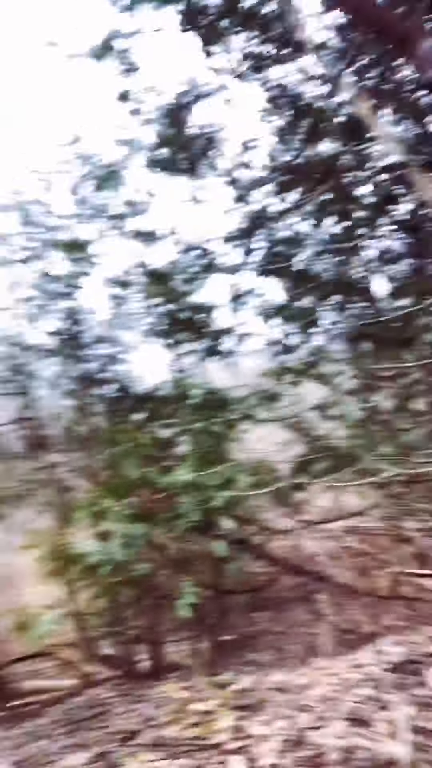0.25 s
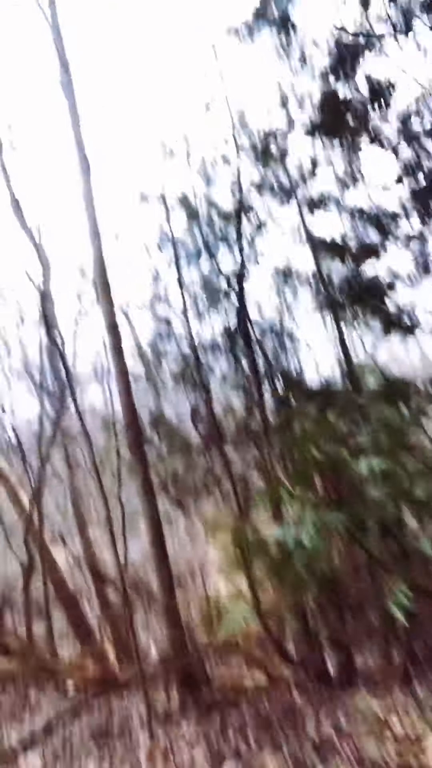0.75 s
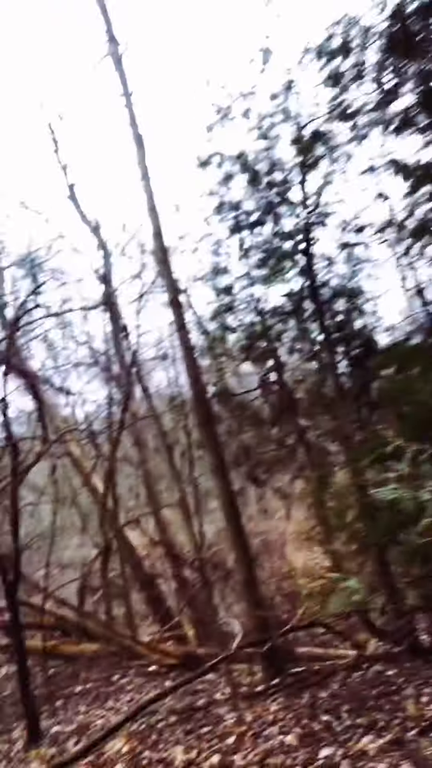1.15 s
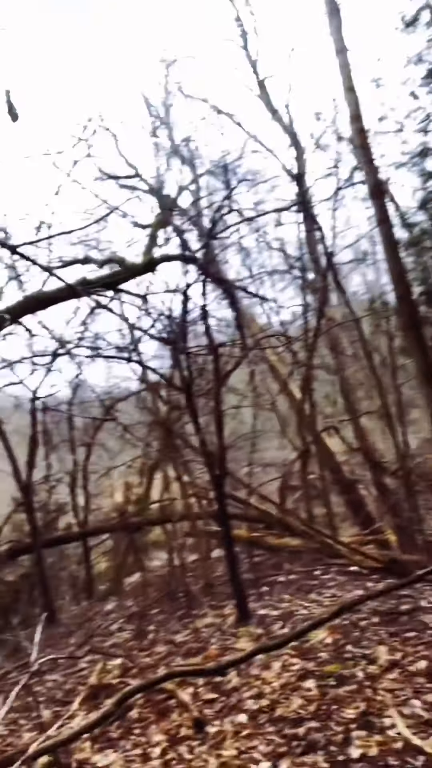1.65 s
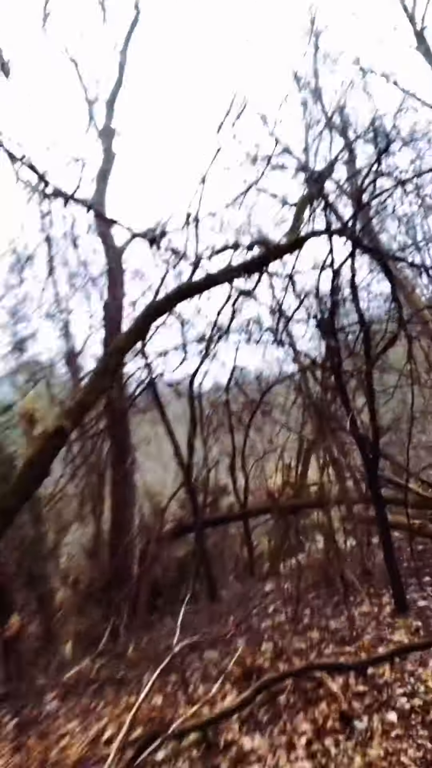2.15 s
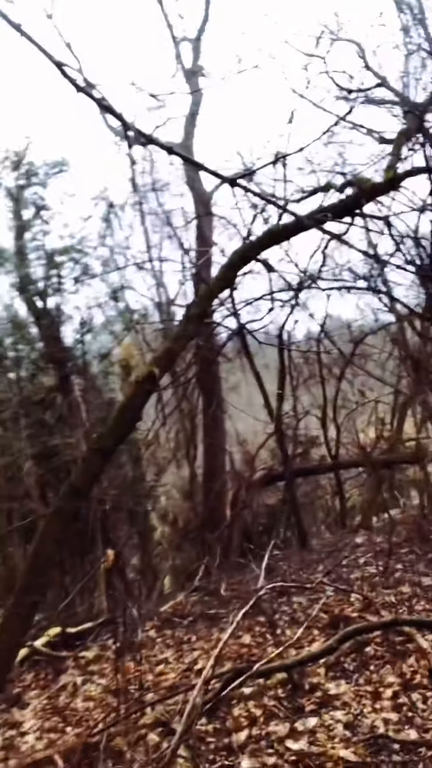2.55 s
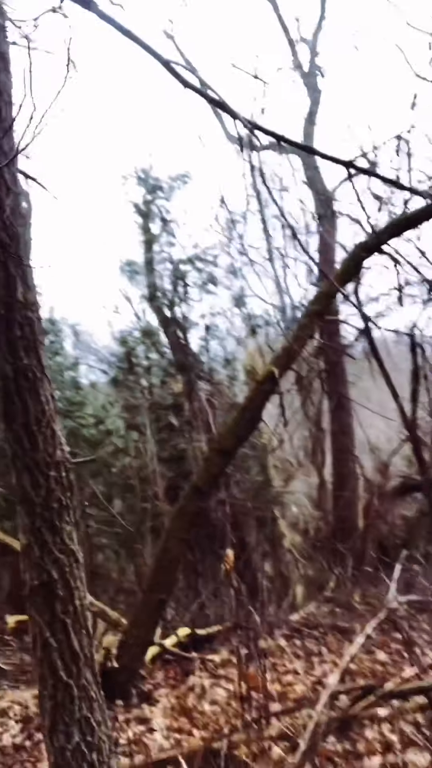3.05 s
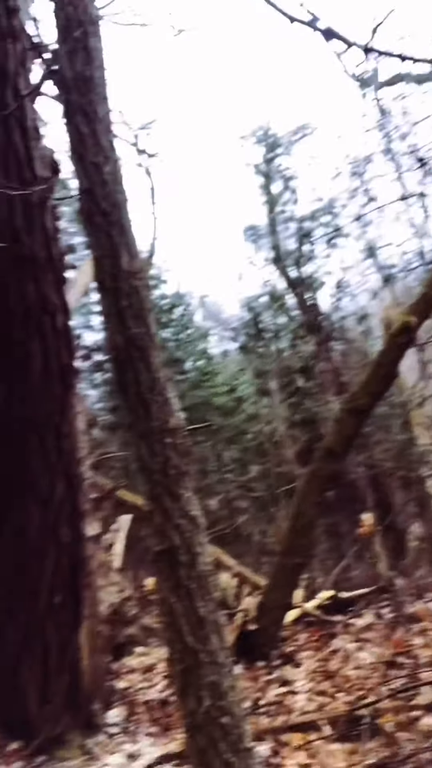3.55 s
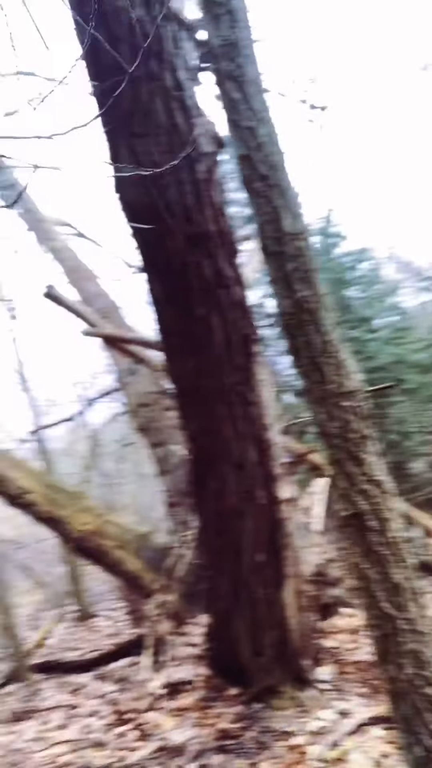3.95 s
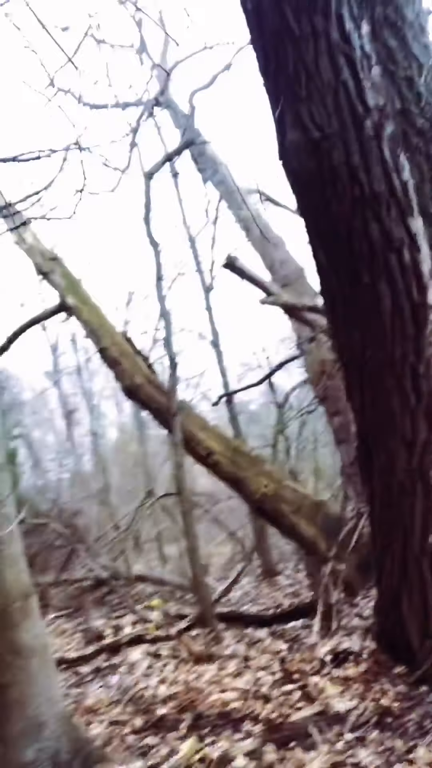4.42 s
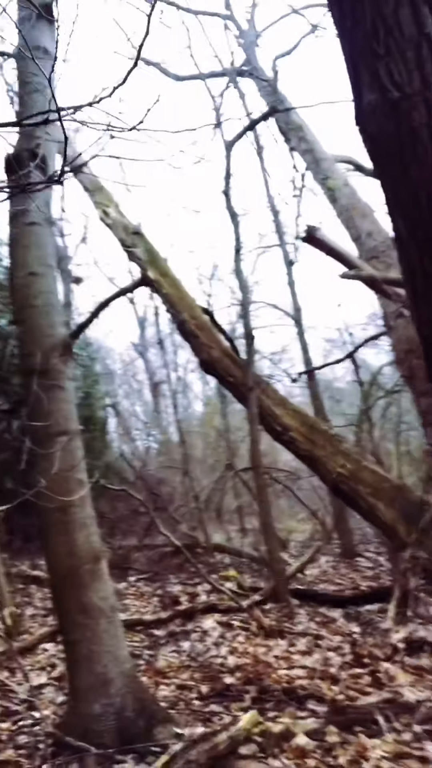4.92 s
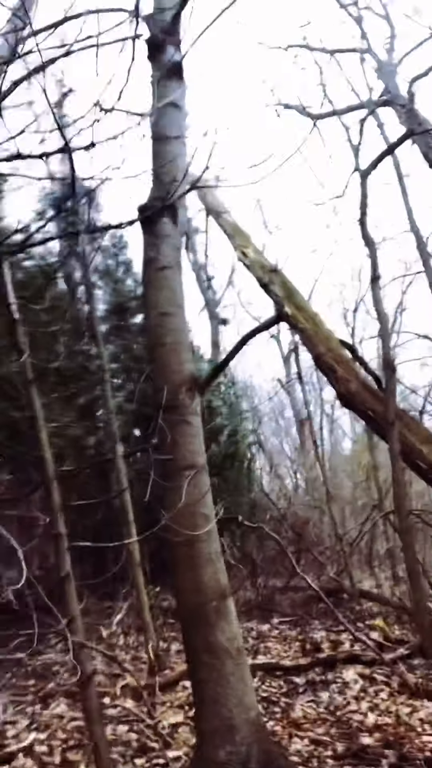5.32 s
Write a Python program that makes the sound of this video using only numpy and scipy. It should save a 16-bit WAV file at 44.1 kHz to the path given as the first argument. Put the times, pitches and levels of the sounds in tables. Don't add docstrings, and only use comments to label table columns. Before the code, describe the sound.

Right away two bursts of very loud, close twig cracks, then leaf crackle and small snaps. A smaller cluster breaks before two seconds, a hard double crack comes near four, and light snaps and swishes near five. Faint birds whistle far off over steady road and wind wash. Mono handheld microphone, the loudest cracks overloading.

```python
import sys
import numpy as np
from scipy import signal
from scipy.io import wavfile

SR = 44100
rng = np.random.default_rng(int(sys.argv[2]) if len(sys.argv) > 2 else 0)


def wav_out(sig):
    wavfile.write(sys.argv[1], SR, np.round(np.clip(np.atleast_2d(sig).T, -1, 1) * 32767).astype(np.int16))


def to_linear_factor(level_db):
    exponent = np.asarray(level_db, float) / 20
    return 10 ** exponent


N = 245901

# start in seconds [s], peak level [dB], centre pitch [Hz],
# bending wave compared with that peak [dB], time for the splinter to fade by 60 dB [s].
TWIG_CRACKS = [(0.0308, -4.5, 7800, -15.5, 0.013), (0.0344, -8, 4040, -28.5, 0.011),
               (0.1375, -1, 3740, -6, 0.036), (0.1417, 8, 5800, -44, 0.0041),
               (0.145, -10, 5750, -25, 0.008), (0.149, -5.5, 2940, -37, 0.013),
               (0.1534, -6, 7240, -31, 0.01), (0.158, 5, 5510, -24.5, 0.013), (0.161, -8, 7000, -22, 0.09),
               (0.1694, -11, 6840, -15.5, 0.012), (1.6071, -19, 5430, -40, 0.0047),
               (1.626, -5.5, 4470, -16.5, 0.0021), (1.629, -14.5, 4220, -18, 0.022),
               (1.6368, -29.5, 6910, 4.5, 0.011), (1.6452, -24, 4390, -22.5, 0.012),
               (3.8711, -4, 5900, -13, 0.0053), (3.8722, 2.5, 7060, -47, 0.029),
               (3.8767, -3.5, 7850, -17, 0.033), (3.882, -17, 6190, -28, 0.014),
               (3.889, -5, 6230, -41, 0.024)]


def cracks():
    out = np.zeros((2, N))
    t = np.arange(1500) / SR
    noise = rng.standard_normal((len(TWIG_CRACKS), len(t)))
    sweep_hz = 300 + 2200 * np.exp(-t / 0.0017)
    bend_shape = to_linear_factor(-60 * t / 0.019) * (1 - np.exp(-t / 0.0023))
    bend = bend_shape * np.sin(2 * np.pi * np.cumsum(sweep_hz) / SR)
    for (s, db, hz, bend_db, t60), grain in zip(TWIG_CRACKS, noise):
        octaves = 1.2 + 0.8 * np.log2(hz / 5000)
        add(out, s, splinter(grain, hz, t60, octaves), db - 0.5)
        add(out, s, bend, db + bend_db + 10)
    return out


def splinter(noise, hz, t60, octaves):
    t = np.arange(len(noise)) / SR
    click = t == 0
    fade = to_linear_factor(-60 * t / t60) * np.minimum(t / 0.00018, 1)
    burst = noise * fade + 2.5 * click
    half = 2 ** (np.clip(octaves, 0.3, 4) / 2)
    near, spread = band(np.array([burst, click]), hz / half, hz * half, order=1)
    stub = 0.22 * fade * np.sin(2 * np.pi * hz * t)
    near = near / np.abs(near).max() + stub
    spread = spread * np.std(near) / np.std(spread)
    return np.array([near, spread]) / np.abs(near).max()


# start in seconds [s], peak level [dB], centre pitch [Hz].
STALK_SNAPS = [(0.6404, -38, 4830), (0.735, -36, 4130), (0.7932, -36.5, 5100), (0.9308, -38.5, 4300),
               (1.704, -32.5, 4120), (1.7266, -27.5, 5240), (1.767, -33, 4480), (1.807, -34, 4750),
               (1.841, -32, 4820), (1.873, -32, 4700), (1.9053, -29, 4180), (1.9132, -25.5, 4160),
               (1.9227, -28.5, 4130), (2.1185, -36, 4200), (2.937, -29.5, 5800), (2.9544, -37, 5710),
               (2.9821, -32.5, 13100), (3.1062, -24.5, 8100), (3.111, -30, 9200), (3.1362, -29.5, 3820),
               (5.046, -35, 12300), (5.0486, -21, 7570), (5.0576, -23.5, 7200), (5.1064, -38, 4120),
               (5.131, -35, 5220), (5.1924, -23, 8000), (5.1998, -27.5, 4380), (5.257, -32.5, 5980),
               (5.266, -29, 5170), (5.354, -35, 4350)]


def snaps():
    out = np.zeros((2, N))
    noise = rng.standard_normal((len(STALK_SNAPS), 1500))
    for (s, db, hz), grain in zip(STALK_SNAPS, noise):
        octaves = 0.55 + 0.22 * np.log2(hz / 5000)
        add(out, s, splinter(grain, hz, 0.0072, octaves), db + 1)
    return band(out, 2800, 12000, order=4)


# start in seconds
# [s], peak level [dB], centre pitch [Hz], time to fade by 60 dB [s], width of the sound [octaves].
WOOD_TICKS = [(.009, -31.5, 5000, .006, 2.5), (.0345, -20, 12500, .012, .71),
              (.115, -34, 5000, 0.0073, 2.1), (.138, -5.5, 1600, .008, 1.2), (.1918, -13, 2800, .005, 1.3),
              (.284, -38, 9000, .0042, 1.6), (.57, -37, 4650, 0.011, 0.46), (.571, -34, 1500, .009, 2.5),
              (.711, -42, 12000, .008, 1.1), (1.382, -43, 4500, .015, 1.5), (1.767, -40, 14500, .006, .4),
              (1.874, -26, 2200, 0.021, .9), (1.913, -19, 1220, .011, 0.93), (2.7, -28, 3300, .006, 1.9),
              (2.982, -33, 13000, .02, .4), (3.8668, -25, 8000, .009, 2.5), (3.872, -3, 9722, .02, .6),
              (3.8722, -19, 1500, 0.011, 1.2), (3.887, -14, 6480, 0.031, 2.7),
              (5.1885, -39, 5970, .01, 2.5), (5.354, -30.5, 12000, .01, 1.1)]


def ticks():
    out = np.zeros((2, N))
    noise = rng.standard_normal((len(WOOD_TICKS), 1500))
    for (s, db, hz, t60, octaves), grain in zip(WOOD_TICKS, noise):
        add(out, s, splinter(grain, hz, t60, octaves), db)
    return out


# start in seconds [s], peak level [dB], pitch [Hz],
# time to fade by 60 dB [s].
SOLE_THUDS = [(0.034, -28, 330, 0.03), (0.139, -15.5, 230, 0.022), (0.566, -26, 463, 0.025),
              (0.63, -37.5, 172, 0.08), (1.382, -34, 162, 0.096), (1.648, -32.5, 980, 0.04),
              (1.86, -32, 135, 0.069), (1.88, -36, 443, 0.18), (1.914, -31, 284, 0.092),
              (1.929, -34, 154, 0.027), (2.513, -33, 397, 0.051), (2.526, -35, 442, 0.039),
              (2.539, -27, 235, 0.04), (2.551, -31.5, 247, 0.034), (3.103, -39.5, 500, 0.054),
              (3.877, -19, 222, 0.026), (3.891, -29.5, 240, 0.22), (3.919, -33, 833, 0.088),
              (5.051, -36, 184, 0.028)]


def thuds():
    out = np.zeros(N)
    t = np.arange(3000) / SR
    noise = rng.standard_normal((len(SOLE_THUDS), len(t)))
    for (s, db, hz, t60), grain in zip(SOLE_THUDS, noise):
        puff_size = 0.61 * (200 / hz) ** 0.4
        puff = puff_size * rms_one(band(grain, hz / 3.5, hz * 3))
        shape = to_linear_factor(-60 * t / t60) * (1 - np.exp(-t / 0.0027))
        thud = shape * (np.sin(2 * np.pi * hz * t) + puff)
        add(out, s, thud / np.abs(thud).max(), db + 2)
    return out


# time in seconds [s], crackle level [dB], brightness [dB per octave].
LITTER_WEIGHT = [(0.0, -50.5, 6), (0.28, -45, 1.5), (0.42, -65, 5), (0.81, -54.5, 7), (1.23, -79, 2),
                 (1.5, -56, 5), (1.77, -47, 4), (1.94, -52.5, 1.5), (2.13, -59.5, 2.5), (2.7, -76.5, -7.5),
                 (3.09, -57.5, 1), (3.32, -54, 3), (3.82, -65.5, -3.3), (3.99, -54, 4.5), (4.86, -67.5, -6),
                 (5.22, -51.5, 9), (5.58, -65.5, -3.5)]


def litter():
    level_db, tilt_db = in_time(LITTER_WEIGHT)
    return to_linear_factor(level_db - 3.5) * crackle(5000, 2.3, tilt_db)


# start in seconds [s], length [s], level [dB],
# brightness [dB per octave].
SHOE_SWISHES = [(0.031, .03, -31.5, 16), (0.387, 0.08, -50, 2.5), (0.625, 0.063, -49.5, 6),
                (0.695, 0.078, -58, -1.5), (0.757, 0.085, -56, 2), (1.605, 0.081, -44.5, 12),
                (1.85, 0.11, -38, 6), (2.217, .03, -66, 6), (2.537, 0.052, -58, 3), (2.93, 0.13, -52, 6),
                (3.108, 0.044, -43.5, 16), (3.207, .04, -66, -3), (3.419, 0.083, -51.5, 8),
                (3.745, .04, -61, 0), (5.042, 0.061, -41, 7.5), (5.117, 0.059, -46.5, 4.5),
                (5.187, 0.036, -39, 8), (5.255, 0.048, -44.5, 4.5), (5.351, 0.041, -54, -2)]


def swishes():
    t = np.arange(N) / SR
    stroke, bright_db = np.zeros((2, N))
    for s, length, db, tilt in SHOE_SWISHES:
        part = (t - s) / length
        rise, fall = part / 0.13, (1.3 - part) / 1.3
        stroke += to_linear_factor(db) * np.clip(np.minimum(rise, fall), 0, 1)
        bright_db[(part > 0) & (part < 1.3)] = tilt
    return stroke * band(crackle(2800, 3.8, bright_db), 2200, 20000)


# frequency [Hz], strength [dB per Hz].
DRY_LEAF_COLOUR = [(710, -31), (1200, -7.5), (2440, 4.5), (2630, 3.5), (4490, -2.5), (8010, -9),
                   (13500, -17), (16300, -21)]


def crackle(per_s, spread_db, tilt_db):
    size_db = spread_db * np.minimum(rng.exponential(1, (2, N)), 4)
    sizes = to_linear_factor(size_db) * rng.choice([-1, 1], (2, N))
    chance = per_s * to_linear_factor(3 * drift(40)) / SR
    clicks = sizes * (rng.random((2, N)) < chance)

    def colour_db(hz):
        return at_hz(DRY_LEAF_COLOUR, hz) + tilt_db * np.log2(hz / 9000)

    sound = banded(clicks, colour_db, low_hz=1210)
    return sound / np.std(band(sound, 6000, 16000))


# start in seconds [s], length [s], pitch [Hz], level [dB].
HELD_WHISTLES = [(2.015, .075, 3000, -50), (2.09, .12, 2560, -54), (2.11, .05, 3000, -57),
                 (2.13, .1, 3580, -62), (2.29, .19, 2290, -54), (2.34, .14, 3550, -63),
                 (2.39, .42, 5510, -67), (1.44, .3, 4370, -66), (2.44, .13, 2500, -55),
                 (2.49, .13, 2320, -58), (2.76, .1, 2880, -52.5), (2.82, .12, 2570, -53),
                 (2.84, .11, 3490, -52), (3.0, .12, 2280, -58), (3.17, .15, 2500, -57),
                 (3.17, .17, 2300, -57), (3.36, .11, 2490, -60), (3.49, .09, 2640, -57),
                 (3.51, .06, 3420, -58), (3.6, .07, 3090, -55), (3.66, .1, 2660, -52),
                 (4.06, .1, 2860, -55), (4.17, .07, 2890, -57), (4.95, .1, 3220, -58.5),
                 (5.44, .09, 3000, -57)]
# start in seconds [s], length [s], pitch [Hz], level [dB].
HUSKY_COOS = [
    (3.54, .1, 1570, -54),
    (4.03, .09, 1270, -52),
    (4.76, .17, 1320, -53),
    (4.83, .12, 1480, -55),
    (5.21, .15, 1290, -51),
]
# start in seconds [s], length [s], first pitch [Hz],
# last pitch [Hz], level [dB].
SLURRED_WHISTLES = [(2.725, .05, 3100, 2870, -52), (2.83, .025, 3100, 3450, -56),
                    (3.11, .05, 2330, 2150, -53), (3.415, .045, 3700, 3350, -51),
                    (3.445, .05, 3450, 2640, -49), (3.56, .05, 2650, 2780, -52),
                    (3.6, .08, 2760, 2580, -51), (4.015, .05, 2800, 2950, -52),
                    (4.01, .09, 2560, 2400, -52.5), (4.1, .13, 2450, 2240, -54),
                    (4.22, .09, 2340, 2300, -57), (5.29, .06, 2050, 2500, -58), (5.34, .1, 2880, 2970, -50),
                    (5.47, .1, 2330, 2230, -50)]


def birds():
    out = np.zeros(N)
    flutter, waver = drift(52.5), drift(110)
    calls = [(s, length, hz, hz, db, 0.35) for s, length, hz, db in HELD_WHISTLES]
    calls += [(s, length, hz, hz, db, 0.45) for s, length, hz, db in HUSKY_COOS]
    calls += [(*row, 0.5) for row in SLURRED_WHISTLES]
    for s, length, from_hz, to_hz, db, hoarse in calls:
        i = round(s * SR)
        t = np.arange(min(round(length * SR), N - i)) / SR
        now = slice(i, i + len(t))
        glide = (1 - np.cos(np.pi * t / length)) / 2
        hz = from_hz + (to_hz - from_hz) * glide + 130 * hoarse * waver[now]
        shape = np.sqrt(np.sin(np.pi * t / length)) * rms_one(to_linear_factor(6 * hoarse * flutter[now]))
        out[now] += to_linear_factor(db + 5) * shape * np.sin(2 * np.pi * np.cumsum(hz) / SR)
    return out


# frequency [Hz], strength [dB per Hz].
WASH_COLOUR = [(25, -10), (92, 1), (202, -5.5), (945, -3.5), (4940, -23), (7830, -36), (10000, -28.5),
               (16300, -44.5)]
# time in seconds [s], level [dB].
WIND_EASING = [(0.0, -41.5), (0.74, -41.5), (1.23, -43), (4.05, -43.5), (4.57, -45), (5.58, -44.5)]


def wash():
    noise = banded(rng.standard_normal((2, N)), lambda hz: at_hz(WASH_COLOUR, hz) + 1.6 * drift(11))
    level_db = in_time(WIND_EASING)[0]
    return to_linear_factor(level_db) * noise / np.std(band(noise, 60, 2300))


# frequency [Hz], time to fade by 60 dB [s].
TRUNK_FADE = [(200, 0.092), (700, 0.86), (2000, 0.25), (4000, 0.51), (8000, 0.32), (14000, 0.22)]


def woodland(direct, spread, trunks_db):
    t = np.arange(SR // 2) / SR
    noise = rng.standard_normal((2, len(t)))
    tail = banded(noise, lambda hz: -60 * t / at_hz(TRUNK_FADE, hz), low_hz=151.4)
    tail = rms_one(tail) * np.minimum(t / 0.0025, 1) / np.sqrt(len(t))
    lag = round(0.0039 * SR)
    ground = np.concatenate([np.zeros(lag), band(direct, 100, 12000, order=1)[:-lag]])
    trunks = signal.fftconvolve(spread, tail)[:N]
    return direct + to_linear_factor(-19.5) * ground + to_linear_factor(trunks_db) * trunks


def in_time(rows):
    s, *columns = np.transpose(rows)
    return [np.interp(np.arange(N) / SR, s, c) for c in columns]


def at_hz(points, hz):
    table_hz, values = np.transpose(points)
    return np.interp(np.log(hz), np.log(table_hz), values)


def rms_one(x):
    return x / np.sqrt(np.mean(x ** 2) + 1e-20)


def drift(rate):
    r = np.exp(-40 * np.pi * rate / SR)
    noise = rng.standard_normal(N // 20 + 4002)
    slow = signal.lfilter([1], [1, -2 * r, r * r], noise)[4000:]
    return np.interp(np.arange(N) / 20, np.arange(len(slow)), rms_one(slow))


def band(x, low_hz, high_hz, order=2):
    edges = [low_hz, min(high_hz, 0.47 * SR)]
    return signal.sosfilt(signal.butter(order, edges, "band", fs=SR, output="sos"), x)


def add(out, s, sound, db):
    i = round(s * SR)
    out[..., i:i + sound.shape[-1]] += to_linear_factor(db) * sound[..., :N - i]


def banded(sources, gain_db, low_hz=29.54):
    edges = low_hz * 2 ** np.arange(0, np.log2(17000 / low_hz) + 0.5, 0.5)
    total = 0
    for k, (low, high) in enumerate(zip(edges, edges[1:])):
        total = total + to_linear_factor(gain_db(np.sqrt(low * high))) * band(sources[k % 2], low, high)
    return total


def scene():
    near = woodland(*(cracks() + snaps() + ticks()), trunks_db=-14)
    underfoot = thuds() + litter() + swishes()
    song = birds()
    far = woodland(song, song, trunks_db=-5)
    return (near + underfoot + far + wash())[None]


def roll_off(x):
    return signal.sosfilt(signal.butter(12, 16440, fs=SR, output="sos"), x)


def record(dry):
    step = signal.firwin(901, np.array([8100]), fs=SR, window="boxcar", pass_zero=False)
    treble = signal.fftconvolve(dry, step[None], mode="same")
    shelved = dry + (to_linear_factor(-3.5) - 1) * treble
    thinned = signal.sosfilt(signal.butter(3, 38, "high", fs=SR, output="sos"), shelved)
    overloaded = np.clip(thinned, -1, 1)
    top_cut = signal.ellip(6, 0.15, 16, 15700, fs=SR, output="sos")
    mix = signal.sosfiltfilt(top_cut, overloaded)
    return roll_off(mix)


dry = scene()
out = record(dry)
wav_out(out)
```